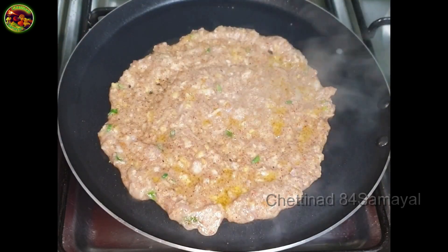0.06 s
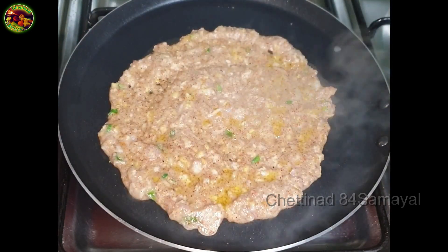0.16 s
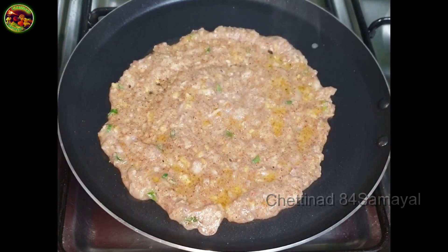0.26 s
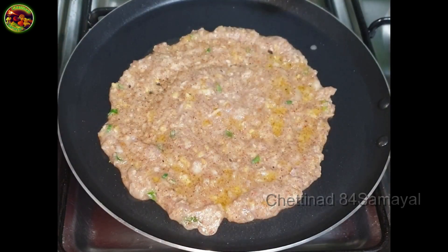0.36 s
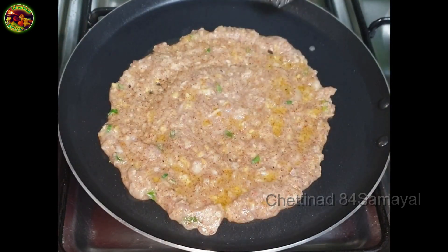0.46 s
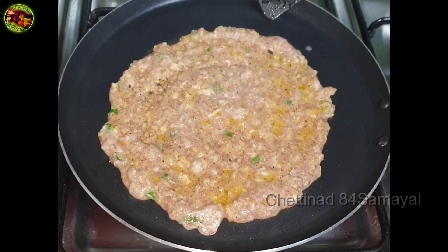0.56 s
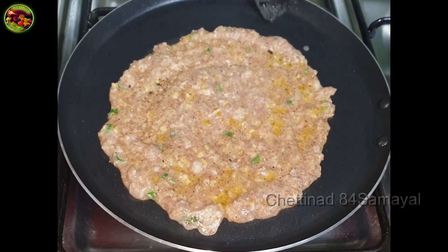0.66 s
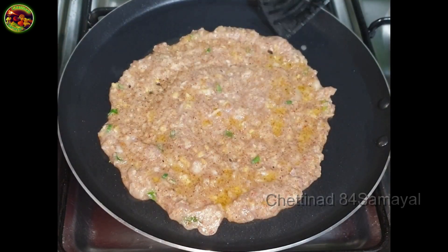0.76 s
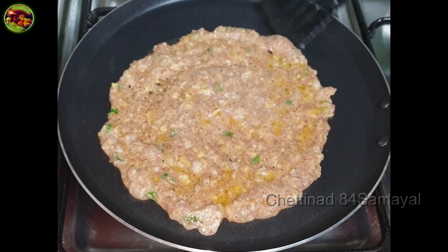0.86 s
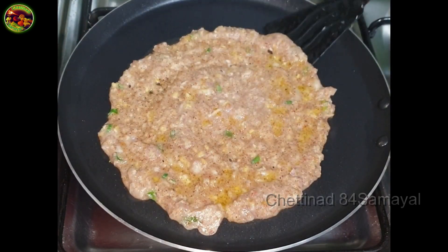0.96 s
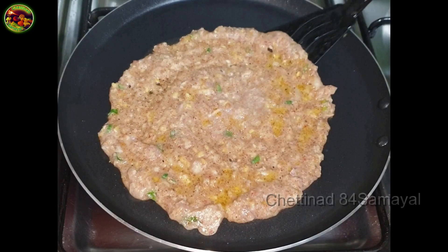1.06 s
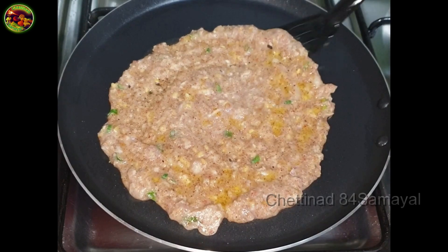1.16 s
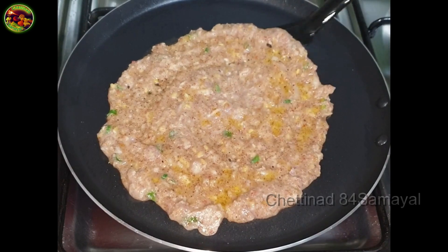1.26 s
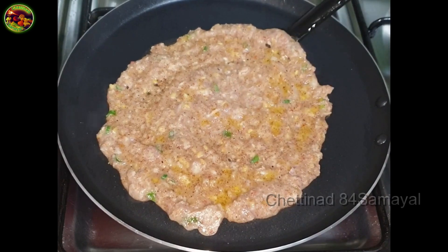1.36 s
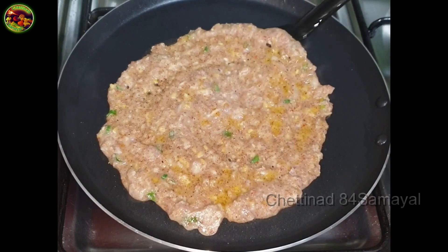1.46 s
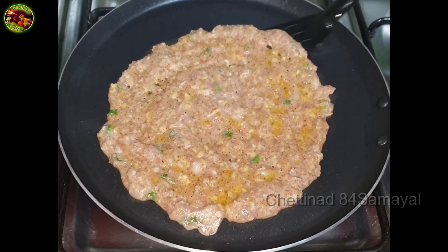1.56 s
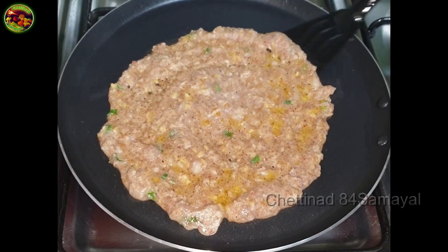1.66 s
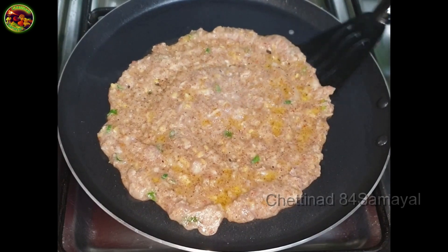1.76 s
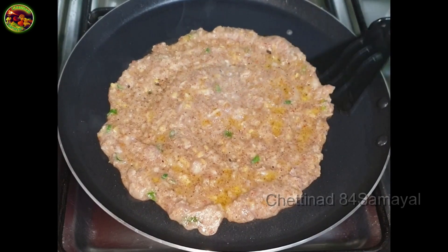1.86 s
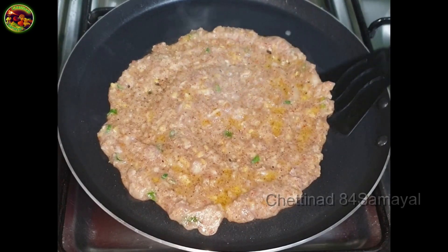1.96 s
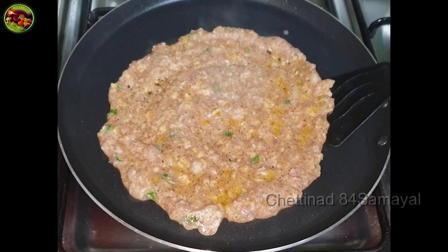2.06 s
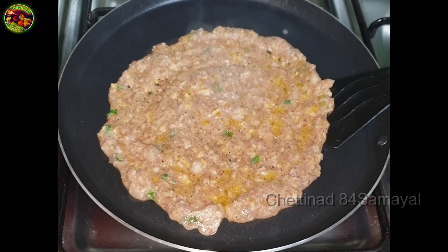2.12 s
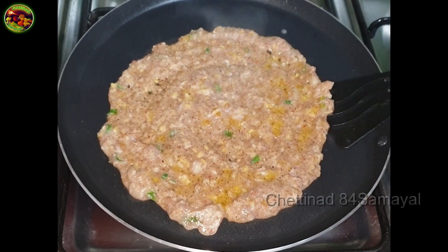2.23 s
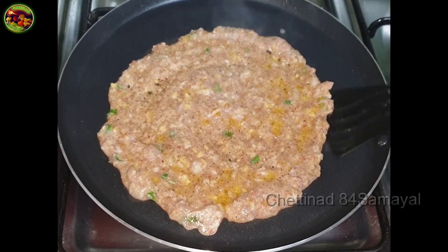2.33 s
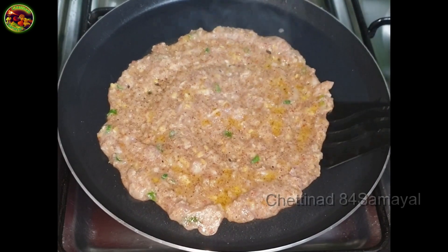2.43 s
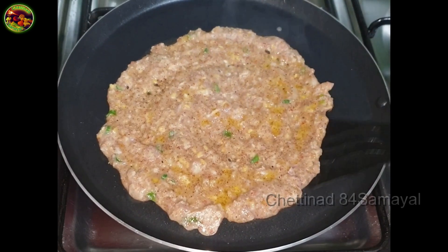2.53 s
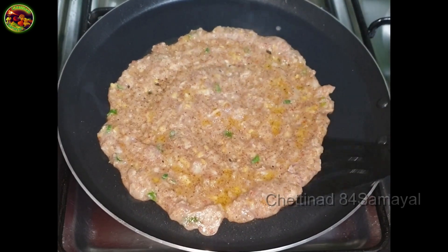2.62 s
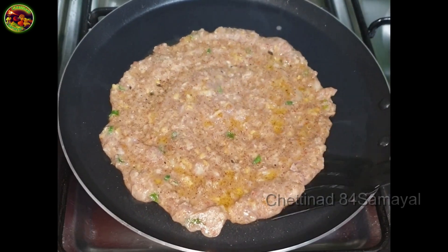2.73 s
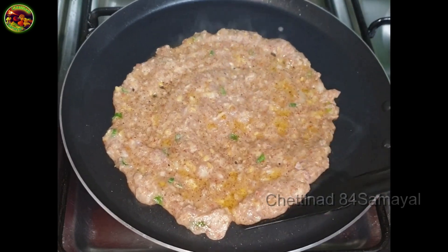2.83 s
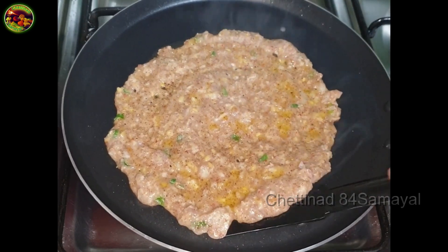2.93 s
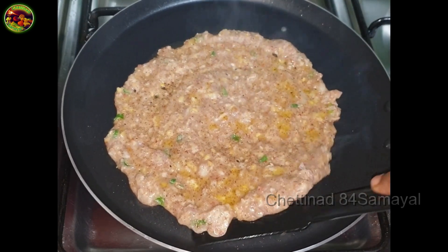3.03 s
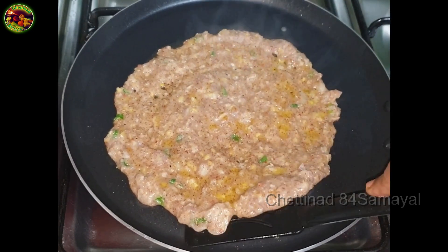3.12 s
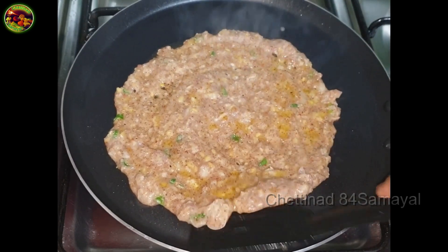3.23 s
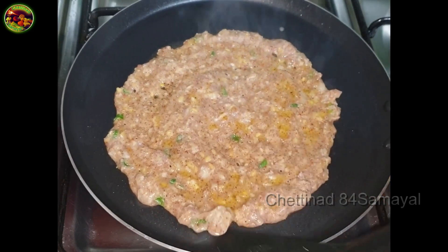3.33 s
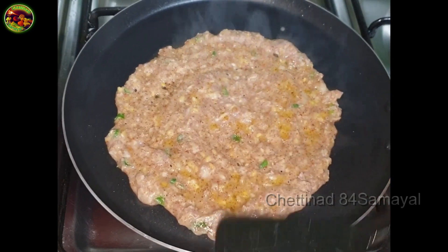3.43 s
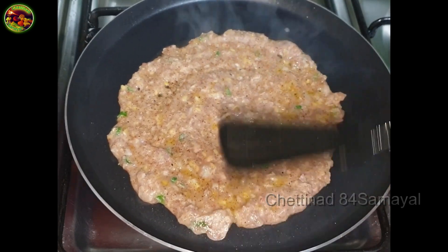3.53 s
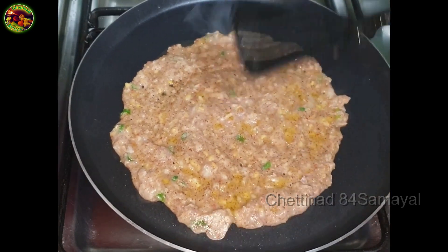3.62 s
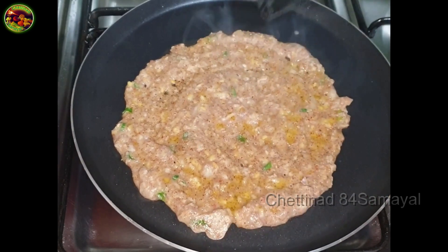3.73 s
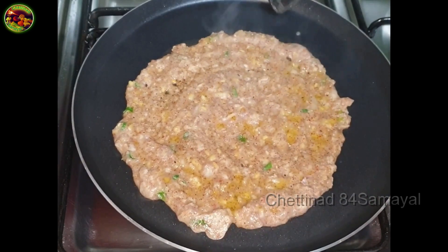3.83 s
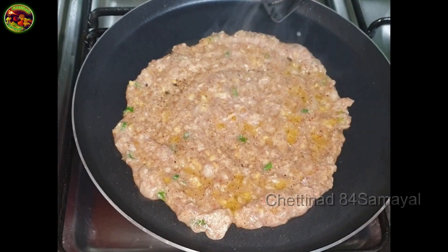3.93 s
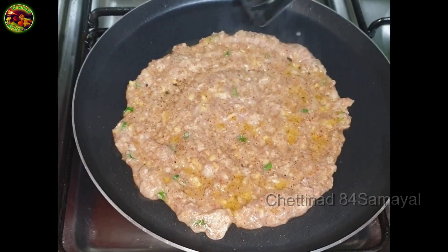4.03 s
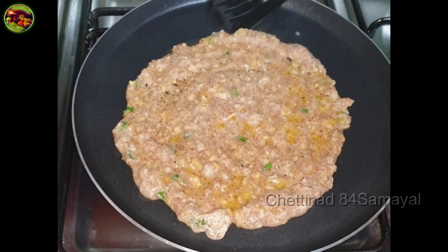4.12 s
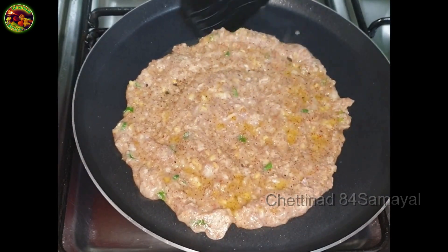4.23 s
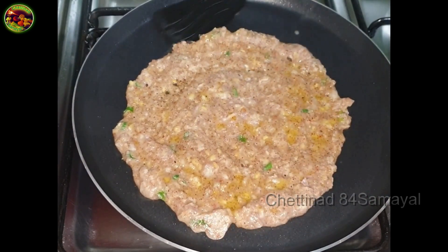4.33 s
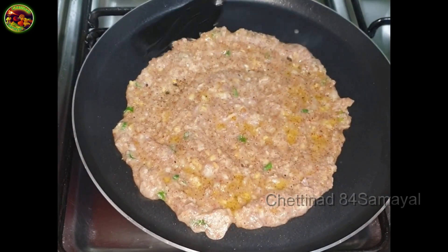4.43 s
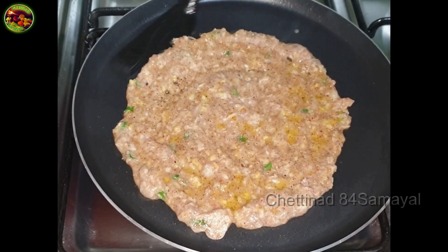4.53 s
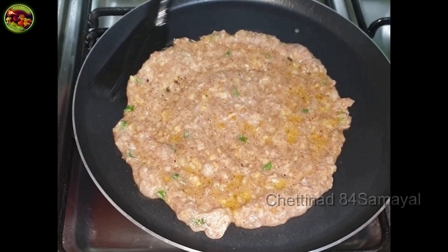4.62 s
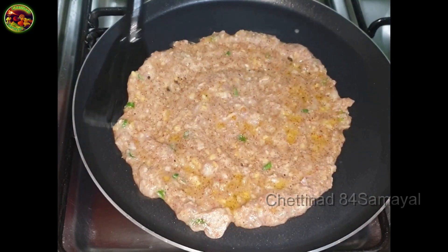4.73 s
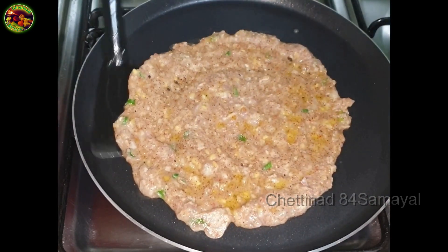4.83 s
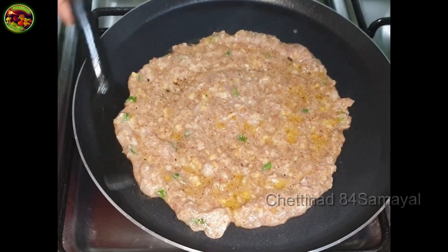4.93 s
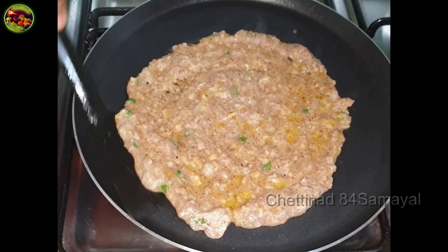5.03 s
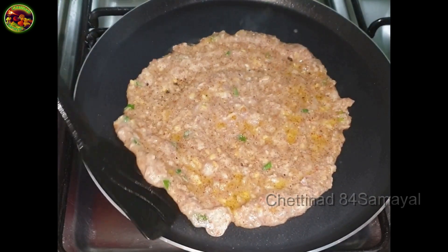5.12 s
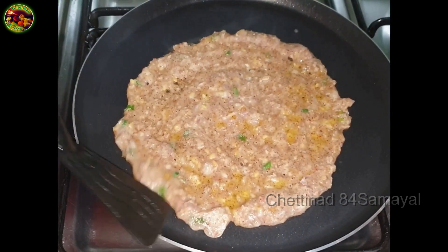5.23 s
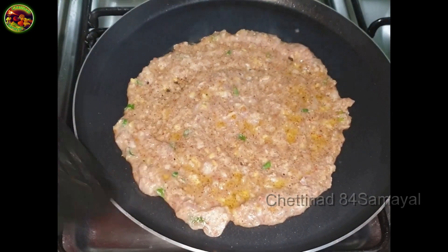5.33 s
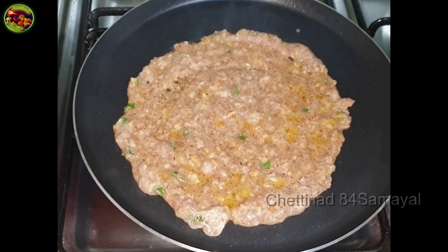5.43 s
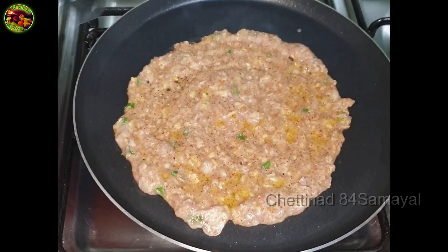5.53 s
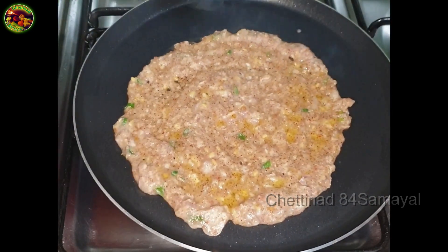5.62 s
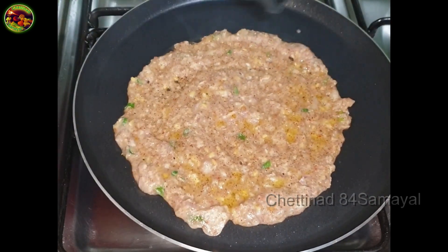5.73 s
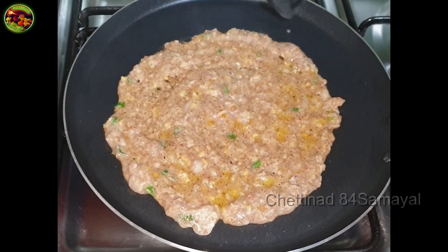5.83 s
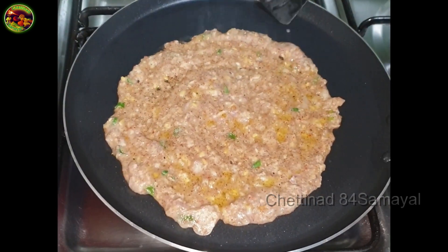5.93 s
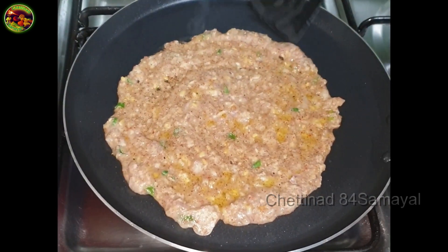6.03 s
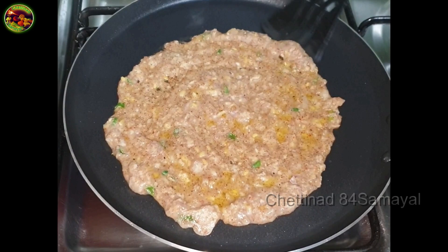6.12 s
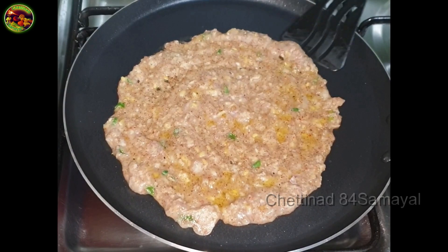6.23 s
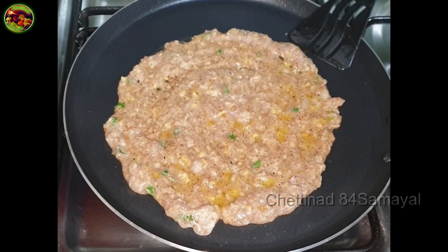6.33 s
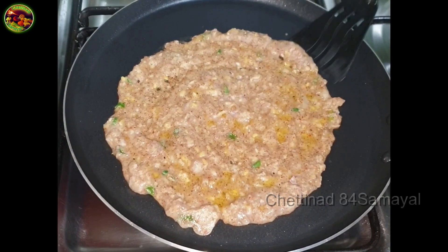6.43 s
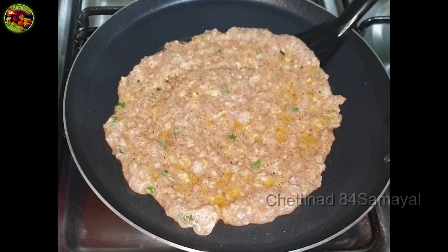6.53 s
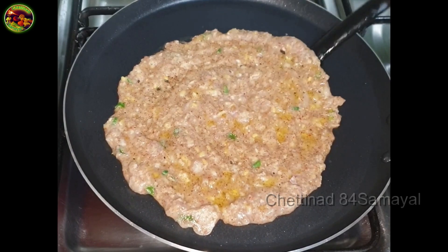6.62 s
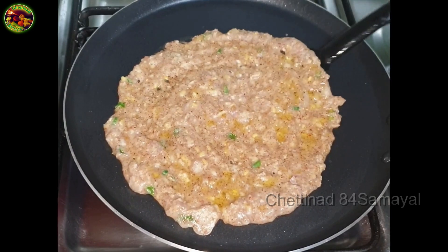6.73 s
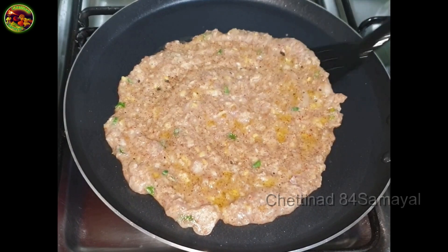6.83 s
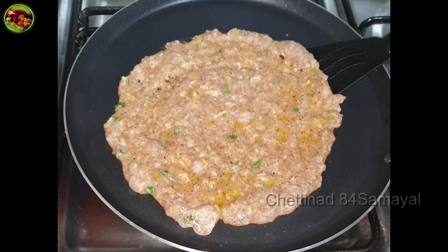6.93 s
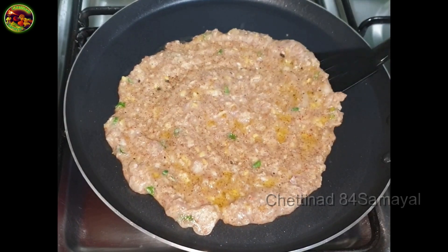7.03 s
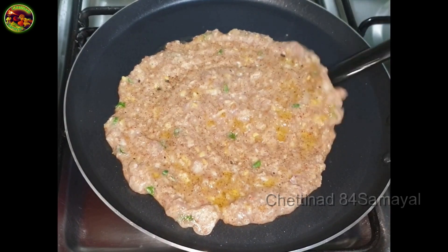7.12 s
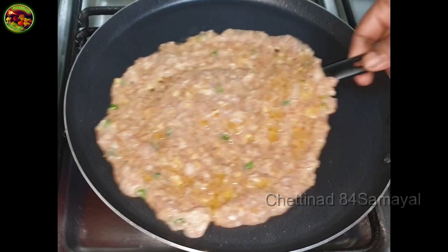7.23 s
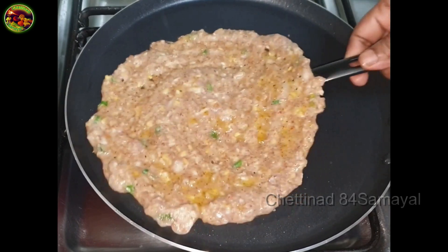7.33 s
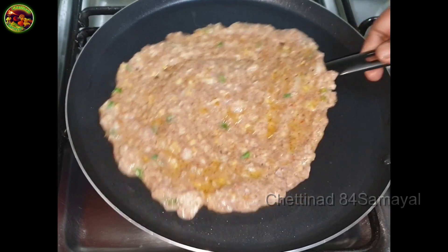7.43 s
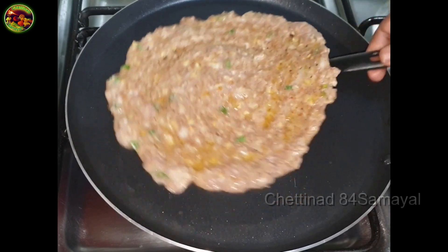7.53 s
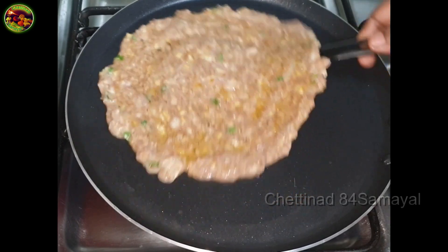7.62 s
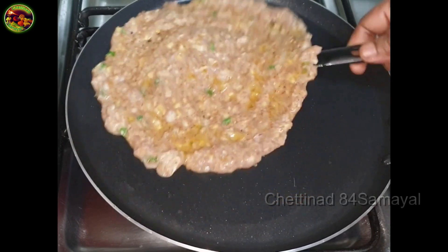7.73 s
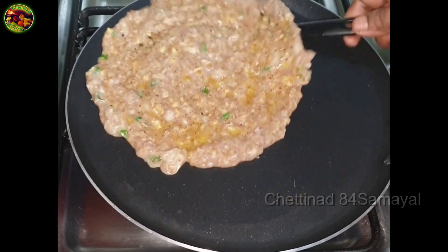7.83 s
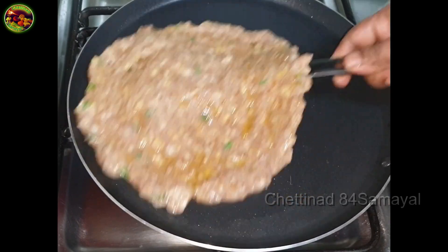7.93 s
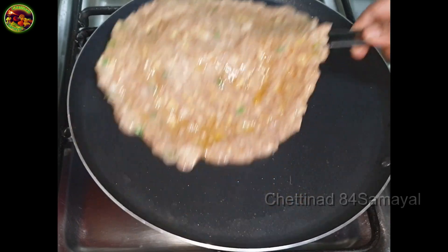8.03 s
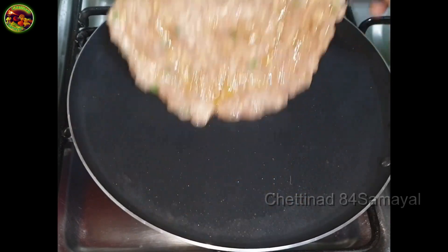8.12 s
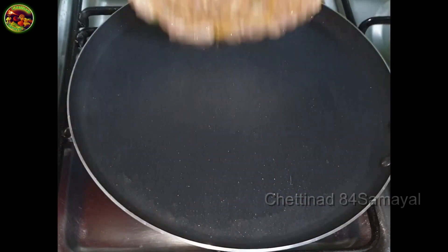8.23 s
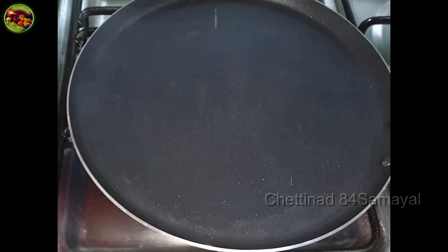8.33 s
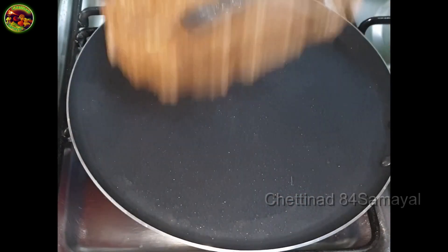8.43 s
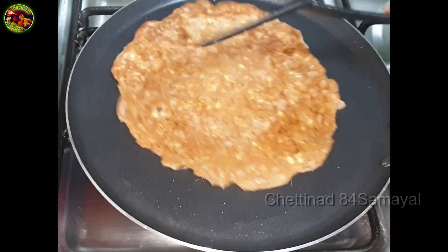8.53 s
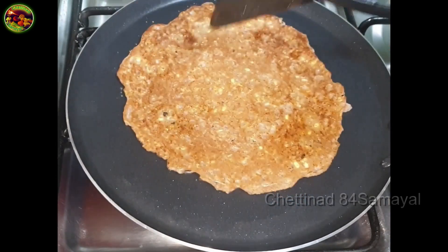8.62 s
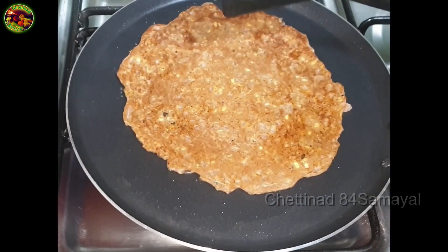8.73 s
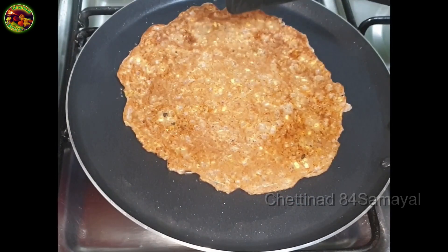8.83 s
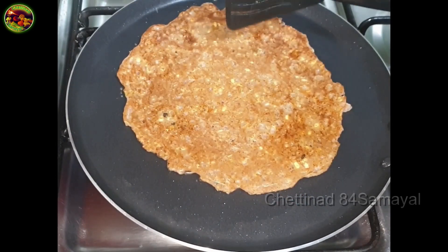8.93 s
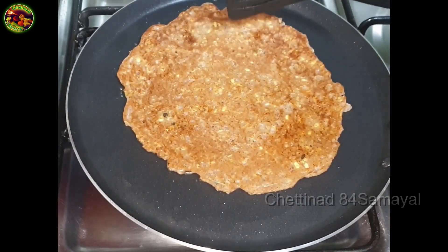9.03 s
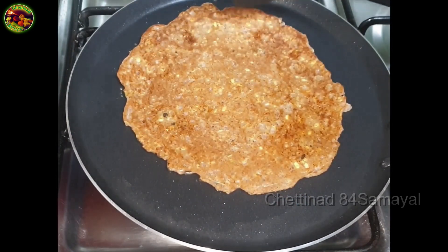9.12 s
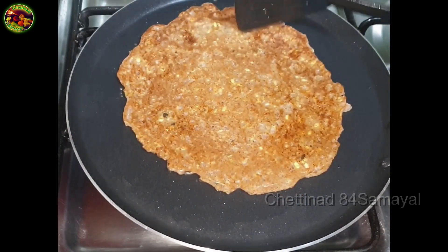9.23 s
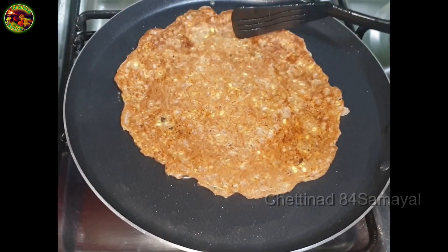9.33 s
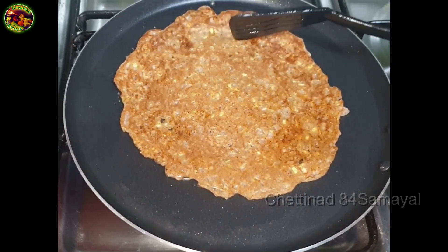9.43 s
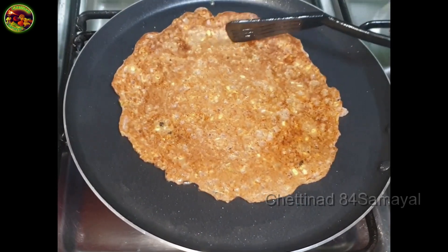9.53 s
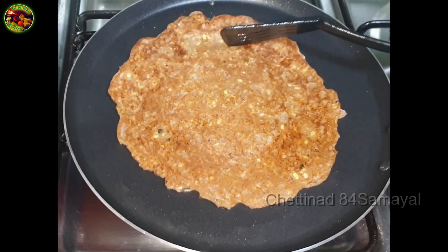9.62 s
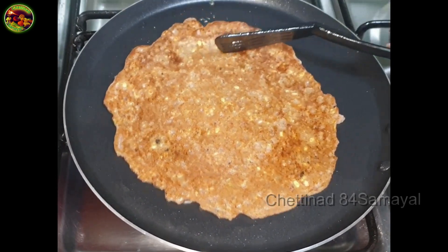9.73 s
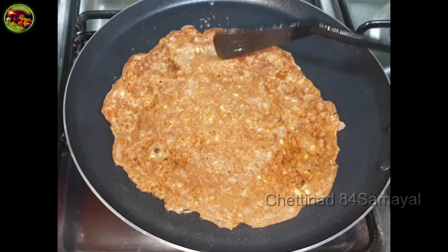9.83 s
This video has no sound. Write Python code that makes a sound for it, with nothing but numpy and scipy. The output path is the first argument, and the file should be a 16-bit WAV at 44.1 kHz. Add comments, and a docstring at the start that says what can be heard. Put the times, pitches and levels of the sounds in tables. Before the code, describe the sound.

A pancake sizzles quietly while a spatula rubs and ticks around it; it is flipped, slaps down, and boils into a loud, dense sizzle.

```python
"""A batter pancake fries on a flat iron pan in a kitchen, heard in stereo: noise and random grains make a fine
sizzle, short snaps make popping fat. A spatula scrapes as filtered noise and taps as decaying pan modes. The
pancake is turned, slaps down as two noise bands, and its wet side boils loudly in dense grains. A motor hums
nearby in sine tones, over a low rumble and a low rub of the jostled pan, both filtered noise."""
import sys
import numpy as np
from scipy import signal
from scipy.fft import rfft, irfft, next_fast_len
from scipy.io import wavfile
from scipy.ndimage import uniform_filter1d, map_coordinates

SR = 44100
rng = np.random.default_rng(int(sys.argv[2]) if len(sys.argv) > 2 else 0)


def gain_from_decibels(decibels):
    """Convert decibel values to linear amplitude factors."""
    exponent = np.asarray(decibels, float) / 20
    return 10 ** exponent


def dump(signal):
    """Clip the signal to [-1, 1] and save it as 16-bit WAV at the path in sys.argv[1]."""
    limited = np.clip(np.atleast_2d(signal).T, -1, 1)
    pcm = np.round(limited * 32767).astype(np.int16)
    wavfile.write(sys.argv[1], SR, pcm)


N = 434826  # length in samples
TREBLE_HZ = (6000, 15000)  # band in which sizzle and steam are levelled


def along(points, hz):
    """Reads (Hz, value) points on a log frequency axis."""
    f, v = np.transpose(points)
    return np.interp(np.log(hz + 1), np.log(f + 1), v)


def curves(rows):
    """Gain per sample for each dB column, at -120 dB outside the table."""
    s, *columns = np.transpose(rows)
    t = np.arange(N) / SR
    return [gain_from_decibels(np.interp(t, s, db, left=-120, right=-120)) for db in columns]


def wobble(rate):
    """A smooth random curve, rate knots a second."""
    at = np.arange(0, N + 64, 64)
    knots = rng.standard_normal(int(N * rate / SR) + 4)
    return np.interp(np.arange(N), at, map_coordinates(knots, [at * rate / SR]))


def filtered(x, response):
    """Shapes x by a complex response of frequency."""
    m = next_fast_len(N + SR // 5)
    return irfft(rfft(x, m) * response(np.fft.rfftfreq(m, 1 / SR)), m)[..., :N]


def unit(x, band=None):
    """Scales the mono sum to rms 1, inside a band in Hz if one is given."""
    mono = x.mean(0)
    if band is None:
        return x / np.sqrt(np.mean(mono ** 2))
    hz, power = signal.welch(mono, SR, nperseg=2048)
    inside = (hz > band[0]) & (hz < band[1])
    return x / np.sqrt(power[inside].sum() * hz[1])


def fading(kicks, life_ms):
    """Each kick dies away exponentially, by a factor e in life_ms."""
    return signal.lfilter([1], [1, -np.exp(-1000 / (life_ms * SR))], kicks)


def crackle(per_s, spread_db, cap_db, life_ms):
    """Short puffs of noise at random moments, most small, a few large."""
    hit = rng.random(N) < per_s / SR
    size = gain_from_decibels(np.minimum(spread_db * rng.exponential(size=N), cap_db)) * hit
    return unit(fading(size, life_ms) * rng.standard_normal((2, N)))


def spurts(per_s, life_ms):
    """A random curve that jumps up and sinks back, mean 0 and spread 1."""
    kicks = (rng.random(N) < per_s / SR) * rng.random(N)
    curve = fading(kicks, life_ms)
    return (curve - curve.mean()) / curve.std()


# Likeness of the two channels. Each row: frequency in Hz, left-right correlation (1 = mono).
ALIKE = [(60, 0.88), (180, 0.94), (350, 0.85), (700, 0.34), (1400, 0.54), (3000, 0.27), (6000, 0.0051)]


def rush(spectrum, grains, share):
    """Coloured stereo mix of noise and grains, near mono in the bass and wide in the treble."""
    share = np.clip(share, 0, 1)
    pair = np.sqrt(2 - 2 * share) * rng.standard_normal((2, N)) + np.sqrt(share) * grains

    def colour(hz):
        turn = np.arccos(np.clip(along(ALIKE, hz), -1, 1)) / 2
        return gain_from_decibels(along(spectrum, hz)) * [np.cos(turn), np.sin(turn)]

    mid, side = filtered(np.array([pair[0] + pair[1], pair[0] - pair[1]]), colour)
    return np.array([mid + side, mid - side])


def ringing(modes, hz, widen, uneven):
    """Response of damped modes to a force; each is widen / t60 Hz wide, a low uneven evens their strengths."""
    total = 0
    for k, (centre, db, t60) in enumerate(modes):
        damping = 1j * hz * widen / t60
        mode = damping / (centre * centre - hz * hz + damping)
        total = total + (-1) ** k * gain_from_decibels(uneven * db) * mode
    return total


def shifting(x, depth_db):
    """Colour that drifts in patches, as the contact moves and damps other modes."""
    z = signal.stft(x, nperseg=512)[2]
    field = uniform_filter1d(rng.standard_normal(z.shape[1:]), size=4, axis=0)
    field = uniform_filter1d(field, size=12, axis=1)
    return signal.istft(z * gain_from_decibels(depth_db * field / field.std()), nperseg=512)[1][:, :N]


SHARPNESS = 1.18  # 1 = pointed swells, 2 = rounded


def swells(s, rise_s, fall_s, db):
    """Power-summed gain of events that each swell to a peak and die away; rise and fall span 10 dB."""
    at = np.arange(0, N + 64, 64)
    late = at / SR - s[:, None]
    far = np.abs(late) / np.where(late < 0, rise_s[:, None], fall_s[:, None])
    power = gain_from_decibels(db[:, None] - 10 * far ** SHARPNESS) ** 2
    return np.interp(np.arange(N), at, np.sqrt(np.sum(power, axis=0)))


LAND_S, CONTACT_S = 8.407, 0.011  # the pancake's first touch, time until its full weight is down


def landing(db, hold_s, t60):
    """Gain that rises as the pancake lands, holds, then decays by 60 dB in t60 seconds."""
    late = np.arange(N) / SR - LAND_S
    fade_s = np.clip(late - CONTACT_S - hold_s, 0, None)
    return np.clip(late / CONTACT_S, 0, 1) ** 1.4 * gain_from_decibels(db - 60 * fade_s / t60)


# Fine sizzle at the dry edge, loud for the first instant.
# Each row: time in seconds, level above 6 kHz in dB before flares and sputter, sputter depth in dB.
FIZZ = [(0.0, -32.5, 1.5), (0.095, -33.5, 1.5), (0.125, -44.5, 1.5), (0.55, -47, 0.7), (1.15, -51.5, 1.5),
        (2.05, -53, 1.4), (2.9, -51.5, 2), (4.1, -50.5, 1.66), (5.55, -52, 2.5), (5.75, -57, 1.5),
        (6.38, -60, 2), (7.45, -56.5, 1.4), (7.7, -51.5, 1.5), (8.049, -51, 2), (8.405, -56, 4)]
# Colour of the sizzle. Each row: frequency in Hz, relative density in dB per Hz.
FIZZ_TONE = [(710, -35), (1200, -18), (1380, -6.5), (1660, -20), (2130, -6.5), (4040, -2.5), (10600, 3.5),
             (15700, 0.5), (16000, -29)]
# The sizzle flares when an edge is lifted and steam escapes.
# Each row: peak in seconds, rise in seconds, fall in seconds, level in dB before sputter.
FLARES = [(1.865, 0.18, 0.14, -52), (2.195, .1, 0.2, -48.5), (2.96, 0.016, 0.88, -46.5),
          (3.265, 0.052, 0.14, -40.5), (4.145, 0.041, 1, -50.5), (5.055, 0.26, 0.084, -48.5),
          (5.245, 0.062, 0.33, -48), (5.585, 0.032, 0.15, -44.5), (6.12, 0.13, 0.12, -46.5),
          (6.435, 0.039, 0.26, -49.5), (6.755, 0.13, 0.064, -49.5), (6.915, 0.047, 0.06, -50.5),
          (7.125, 0.24, 0.067, -51.5), (7.295, 0.065, 0.03, -46.5), (8.115, 0.044, 0.16, -47)]
GRAINS_PER_DB = 0.1565  # share of grains in the sizzle per dB of sputter


def sizzle():
    """Tiny steam bursts, hundreds a second, over a steady hiss; both sputter together."""
    depth_db = np.interp(np.arange(N) / SR, *np.transpose(FIZZ)[::2])
    grains = crackle(per_s=220, spread_db=4.0, cap_db=4.0, life_ms=0.31)
    fizz = unit(rush(FIZZ_TONE, grains, share=GRAINS_PER_DB * depth_db), TREBLE_HZ)
    sputter = gain_from_decibels(depth_db * np.minimum(spurts(per_s=110, life_ms=9.5), 2.8))
    return np.hypot(curves(FIZZ)[0], swells(*np.transpose(FLARES))) * sputter * fizz


# Colour of the rubbing blade. Each row: frequency in Hz, relative density in dB per Hz.
SCRAPE_TONE = [(290, -49), (500, 0), (769, 0.5), (1170, -5.5), (1590, -2.5), (7000, 4)]
# Modes of the iron pan, for scrapes, taps and slap.
# Each row: frequency in Hz, relative strength in dB, nominal time to fall 60 dB in seconds.
PAN = [(82, -26, 0.26), (133, 4.5, 0.24), (238.4, -3.5, 0.23), (322, -1.5, 0.22), (526, -4.5, 0.068),
       (730, 0.5, 0.036), (900, -9.5, 0.018), (977, 3, 0.022), (1080, -7.5, 0.028), (1333, -6, 0.055),
       (1596, -8.5, 0.072), (2200, -2, 0.055), (2590, -17, 0.025), (4300, -1, 0.033), (4670, -4, 0.033)]
# Spatula strokes on the iron. Each row: peak in seconds, rise in seconds, fall in seconds, hiss in dB,
# grind in dB.
STROKES = [(1.17, 0.19, 0.13, -60.5, -60), (1.535, 0.093, 0.12, -58, -59), (2.155, 0.11, 0.2, -63, -71),
           (2.55, 0.1, 0.15, -59.5, -63), (3.0, 0.048, 0.37, -52, -72), (3.26, 0.062, 0.13, -44.5, -54),
           (3.835, 0.013, 0.11, -65, -59), (5.45, 0.22, 1, -56.5, -73), (5.845, 0.022, 0.25, -85, -70),
           (6.107, 0.06, 0.095, -62, -60), (6.425, 0.038, 0.21, -51.5, -57.5),
           (6.69, 0.069, 0.16, -50.5, -58.5), (7.105, 0.082, 0.11, -48, -50.5),
           (7.735, 0.13, 0.088, -48.5, -52.5), (7.985, 0.15, 0.12, -53.5, -65)]
# Fainter mid-band hiss of the pan between strokes, gone while the pancake is in the air.
# Each row: time in seconds, hiss in dB, grind in dB.
BETWEEN = [(0.0, -65, -61), (0.085, -60, -66), (0.135, -64, -75), (0.45, -61.5, -69), (0.9, -61.5, -71.5),
           (2.8, -63, -73.5), (3.7, -64.5, -68.5), (4.45, -63.5, -75), (4.7, -59, -67.5), (5.3, -58, -71),
           (5.8, -75, -86), (6.95, -90, -78), (7.45, -57, -63.5), (8.05, -60.5, -74), (8.35, -100, -98)]


def scrape():
    """Clumped slips of the blade drive the pan's modes, damped by the contact; pressure grinds near 1 kHz."""
    slips = crackle(per_s=150, spread_db=2.0, cap_db=8.5, life_ms=2.4)

    def driven_pan(hz):
        modes = 0.55 + ringing(PAN[:-2], hz, widen=2.7, uneven=0.78)
        return modes / (1 + (hz / 3400) ** 3) / (1 + (800 / (hz + 1)) ** 6)

    rub = filtered(rush(SCRAPE_TONE, slips, share=0.44), driven_pan)
    rub = shifting(rub, depth_db=2.0)
    grind = filtered(rub, lambda hz: 1 / (1 + (hz / 1300) ** 8))
    s, rise_s, fall_s, hiss_db, grind_db = np.transpose(STROKES)
    faint_hiss, faint_grind = curves(BETWEEN)
    hiss_gain = np.hypot(faint_hiss, swells(s, rise_s, fall_s, hiss_db))
    grind_gain = np.hypot(faint_grind, swells(s, rise_s, fall_s, grind_db))
    both = hiss_gain * unit(rub - grind, (1400, 4000)) + grind_gain * unit(grind, (800, 1300))
    return gain_from_decibels(0.6 * wobble(35)) * both


# Motor nearby. Each row: time in seconds, hum in dB, low throb in dB.
MOTOR = [(0.0, -46, -51.5), (2.065, -52.5, -51), (2.65, -57.5, -48.5), (3.455, -52.5, -48.5),
         (4.515, -50, -52.5), (6.355, -43, -52), (7.475, -41.5, -45), (8.005, -40.5, -47.5),
         (8.375, -43, -46), (8.675, -43, -52.5), (9.86, -43, -54)]
# Overtones of the hum. Each row: multiple of the hum, mean peak level in dB relative to -48.5 dB,
# before a random waver.
OVERTONES = [(2, -23), (3, -20)]
HUM_HZ, THROB_HZ = 97.6, 63


def motor():
    """A hum with two overtones and a lower throb that wavers in pitch and size."""
    hum, throb = curves(MOTOR)
    turn = 2 * np.pi * HUM_HZ * np.arange(N) / SR + 0.056 * wobble(6.2)
    tone = np.sqrt(2) * hum * np.sin(turn)
    for multiple, db in OVERTONES:
        tone += gain_from_decibels(db - 48.5 + 3.7 * wobble(5)) * np.sin(multiple * turn)
    size = 1 + np.tanh(0.39 * wobble(5))
    low = size * np.sin(2 * np.pi * np.cumsum(THROB_HZ + 1.85 * wobble(8)) / SR)
    return (tone + throb * unit(low[None])) * gain_from_decibels([[.4], [-.4]])  # left a shade louder


# Colour of the room's air. Each row: frequency in Hz, relative density in dB per Hz.
ROOM_TONE = [(13, -36), (22, -6), (86, -1.5), (118, -3), (156, -12), (295, -18.5), (366, -24.5), (650, -33),
             (1110, -48.5), (3250, -75), (5500, -120)]
# Low rub as hand and spatula jostle the pan.
# Each row: time in seconds, level at 400-700 Hz in dB before a slow waver.
JOSTLE = [(0, -69.5), (1.15, -73), (2.2, -63.5), (2.85, -67), (4.2, -68.5), (5.3, -61), (6, -64.5),
          (9.86, -68)]


def rumble():
    """Low noise in the kitchen under the rub of the jostled pan; both waver slowly together."""
    noise = rush(ROOM_TONE, 0, share=0)
    low = filtered(noise, lambda hz: 1 / (1 + (hz / 380) ** 4))
    jostle = curves(JOSTLE)[0] * unit(noise - low, (400, 700))
    return gain_from_decibels(1.28 * wobble(4.574)) * (gain_from_decibels(-53.0) * unit(low) + jostle)


# Bursting fat. Each row: start in seconds, snap level in dB before the bass is cut, centre in Hz,
# left over right in dB.
POPS = [(0.0852, -9, 10900, -3), (0.263, -21, 2570, 2), (1.343, -24.5, 12700, -1.0),
        (1.795, -29.5, 8200, 1), (2.096, -26, 9350, 5), (2.159, -27, 13000, -6), (2.189, -25, 13500, -7),
        (2.2387, -26, 14000, -1.5), (2.388, -26, 11500, -1), (2.4518, -19, 9400, -9),
        (2.933, -20.5, 9050, -5), (3.1858, -21, 5380, -13), (3.204, -17, 2900, -6), (3.255, -11, 4850, -12),
        (3.277, -9.5, 5100, -4), (4.138, -16.5, 12700, 0), (4.5332, -21.5, 6700, -8),
        (4.6532, -24.5, 6600, -12), (4.915, -27, 13400, -12), (5.0734, -19, 3900, -5),
        (5.357, -25, 9900, -11), (6.1007, -21, 6560, -11), (6.273, -22.5, 11500, -12),
        (6.428, -25, 6000, -11), (6.905, -25, 3500, -5), (7.5487, -26.5, 5670, -12),
        (7.917, -28, 9000, 0.5), (8.014, -23, 10700, 1.0), (8.1337, -17.5, 8830, 1.5),
        (8.18, -21, 13800, 3), (8.1952, -13.5, 9500, 1), (8.801, -13, 2780, -5), (9.1087, -8, 13700, -6),
        (9.197, -11, 11300, -8)]


def pops():
    """Each burst is a short decaying sine snap with a few milliseconds of noise spray."""
    out, t = np.zeros((2, N + SR)), np.arange(SR // 40) / SR
    for s, db, hz, pan_db in POPS:
        snap = np.sin(2 * np.pi * hz * t) * gain_from_decibels(-60 * t / 0.001)
        bright = signal.lfilter([1, -.6], [1], rng.standard_normal((2, len(t))))
        spray = 0.19 * gain_from_decibels(-60 * t / 0.026) * bright
        sides = gain_from_decibels([[pan_db / 2], [-pan_db / 2]])
        out[:, round(s * SR):][:, :len(t)] += gain_from_decibels(db) * sides * (snap + spray)
    return filtered(out[:, :N], lambda hz: (1j * hz / (1j * hz + 1200)) ** 2)


# The room's answer. Each row: frequency in Hz, time to fall 60 dB in seconds.
KITCHEN = [(200, 0.51), (2000, 0.2), (10000, 0.018)]


def kitchen(x):
    """Walls answer with decaying noise, each frequency dying at its own speed."""
    hz, t, z = signal.stft(rng.standard_normal((2, SR // 2)), SR, nperseg=256)
    decay = gain_from_decibels(-60 * t / along(KITCHEN, hz)[:, None])
    tail = signal.istft(z * decay, SR, nperseg=256)[1]
    late = np.pad(x, (300, 0))[None]  # 300 samples until the first answer
    return signal.fftconvolve(late, tail / np.linalg.norm(tail[0]), axes=1)[:, :N]


# Contacts on the pan: spatula contacts, and in the last row the clink as the pancake lands; the spot touched
# favours # the modes near one pitch. Each row: start in seconds, relative level in dB, relative thud in dB,
# relative clink in # dB, favoured pitch in Hz.
TAPS = [(1.02, -41.5, -8, -15, 970), (1.093, -37, -9, -12, 970), (1.138, -45, -3, -17, 940),
        (1.176, -39, -14, -22, 925), (1.229, -40.5, -12, -3, 2100), (1.858, -41, -15, -7, 560),
        (1.87, -39.5, -21, -3.5, 560), (1.88, -43, -15, -6, 2200), (2.075, -44.5, -18, -20, 900),
        (2.144, -39.5, -2.5, -18, 480), (2.178, -48, -5, -22, 322), (2.225, -44.5, -6.5, -22, 500),
        (2.441, -32.5, -8.5, -11, 940), (2.562, -35, -9.5, -19, 905), (3.29, -47.5, -8, -22, 330),
        (3.81, -34.5, -26, 0.5, 1400), (5.21, -56, -4, 11, 300), (5.823, -49, -39, 3, 1060),
        (7.192, -34, -26, -32, 980), (7.651, -42, -25, -1, 2600), (7.721, -31, -17.5, -24, 1490),
        (7.818, -48, -5, -6, 140), (8.423, -30, -16, -12, 4570)]
FAVOUR_DB, FAVOUR_OCTAVES, BELOW_DB_PER_OCTAVE = 11, 0.61, 4.5
RATTLE = 0.3  # roughness of the ring while the blade rests on the iron


def taps():
    """Every contact rings the pan's modes anew, slightly detuned and rough, with a short noise crack."""
    out, t = np.zeros(N + SR), np.arange(SR // 3) / SR
    hz, mode_db, t60 = np.transpose(PAN)[..., None]
    onset = 1 - np.exp(-t * hz / 0.9)
    for s, db, thud_db, clink_db, spot_hz in TAPS:
        # thud sets the modes below 400 Hz, clink those above 2400 Hz
        share_db = np.where(hz < 400, thud_db + 9, np.where(hz > 2400, clink_db + 9, 0))
        share_db = share_db + FAVOUR_DB * np.exp(-(np.log2(hz / spot_hz) / FAVOUR_OCTAVES) ** 2)
        octaves_below = np.clip(np.log2(spot_hz / hz), 0, None) * (hz > 400)
        share_db = share_db - BELOW_DB_PER_OCTAVE * octaves_below
        scatter_db = 2.5 * rng.standard_normal(hz.shape)
        detune = 0.012 * rng.standard_normal(hz.shape)
        rough = uniform_filter1d(rng.standard_normal((2, len(t))), size=90)
        envelope = gain_from_decibels(mode_db + share_db + scatter_db - 60 * t / t60) * onset
        ring = envelope * (1 + RATTLE * unit(rough)[0]) * np.sin(2 * np.pi * hz * (1 + detune) * t)
        crack = gain_from_decibels(clink_db + 22 - 60 * t / 0.016) * rng.standard_normal(len(t))
        out[round(s * SR):][:len(t)] += gain_from_decibels(db - 11.0) * (ring.sum(0) + crack)
    return out[:N]


# Colours of the landing's thump and smack. Each row: frequency in Hz, relative density in dB per Hz.
THUMP_TONE = [(45, -26), (79, -2), (97, -11), (115, 1), (150, -5), (186, -4), (232, -20), (288, -3),
              (350, -17.5), (1000, -26.5)]
SMACK_TONE = [(350, -15), (600, -12.5), (903, -12), (1300, -1), (2340, -16), (5000, -40)]


def slap():
    """Soft wet weight on iron: a smeared low thump and a short smack that rings the pan."""
    low = unit(rush(THUMP_TONE, 0, share=0), (110, 400))
    rung = filtered(rush(SMACK_TONE, 0, share=0),
                    lambda hz: 0.23 + ringing(PAN, hz, widen=1.6, uneven=0.17))
    high = unit(rung, (700, 1500))
    thump = landing(db=-34, hold_s=0.04, t60=0.42) * low
    smack = landing(db=-30, hold_s=0.023, t60=0.15) * high
    return thump + smack


# Wet side boiling on the iron. Each row: time in seconds, treble in dB, bubble band in dB,
# both before a slight waver and the bubbles before the splash.
BOIL = [(8.408, -45, -88), (8.42, -33, -54), (8.515, -33, -38.5), (8.625, -31, -35.5), (9.405, -33.5, -36),
        (9.565, -32, -33.5), (9.86, -33, -34)]
# Colour of the boil. Each row: frequency in Hz, relative density in dB per Hz.
BOIL_TONE = [(180, -38), (300, -19.5), (725, -20), (1080, -10), (1170, -13.5), (1580, -7.5), (1810, -8),
             (2880, -3), (4020, -4), (6960, -0.5), (11100, 0.5), (15750, -3), (16000, -36)]


def boil():
    """Thousands of steam bursts a second under the wet side, with larger, lower bubbles and a landing splash."""
    def lower(hz):
        return 1 / (1 + (hz / 5500) ** 4)

    steam = rush(BOIL_TONE, crackle(per_s=2300, spread_db=5.5, cap_db=17, life_ms=0.32), share=0.3)
    steam = unit(filtered(steam, lambda hz: 1 - lower(hz)), TREBLE_HZ)
    bubbles = rush(BOIL_TONE, crackle(per_s=480, spread_db=0.5, cap_db=6, life_ms=0.63), share=0.22)
    bubbles = unit(filtered(bubbles, lower), (1500, 5000))
    steam_gain, bubble_gain = curves(BOIL)
    splash = landing(db=-29.5, hold_s=0.013, t60=0.13)
    bubble_gain = np.hypot(bubble_gain, splash)
    return (steam_gain * steam + bubble_gain * bubbles) * gain_from_decibels(0.35 * wobble(7.3))


LEFT_LAG_S = 2 / SR


def scene():
    """All sources; walls answer taps and pops; spatula, motor and rumble reach the left microphone later."""
    hits, fat = taps(), pops()
    walls = filtered(kitchen(hits + fat.mean(0)), lambda hz: hz / (hz + 500))  # little bass

    def lag(hz):
        return np.exp(-2j * np.pi * hz * np.array([[LEFT_LAG_S], [0]]))

    nearer_right = filtered(hits + scrape() + motor() + rumble(), lag)
    return fat + gain_from_decibels(-4.5) * walls + slap() + sizzle() + boil() + nearer_right


def low_pass(x):
    """Removes everything above the highest recorded frequency."""
    return signal.sosfilt(signal.butter(12, 16860, fs=SR, output="sos"), x)


def record(dry):
    """Nothing at or above 16.1 kHz is kept in the finished mix."""
    mix = filtered(dry, lambda hz: hz < 16100)
    return low_pass(mix)


dry = scene()
out = record(dry)
dump(out)
```